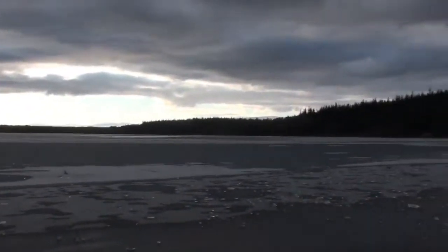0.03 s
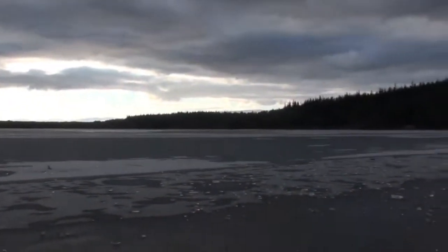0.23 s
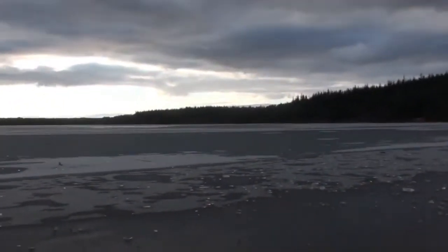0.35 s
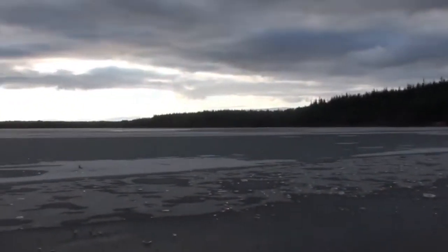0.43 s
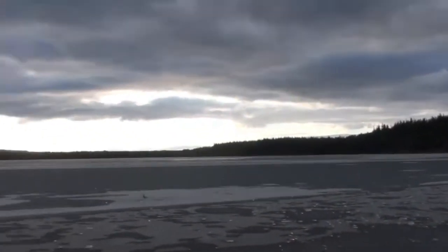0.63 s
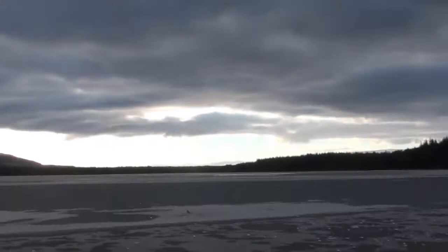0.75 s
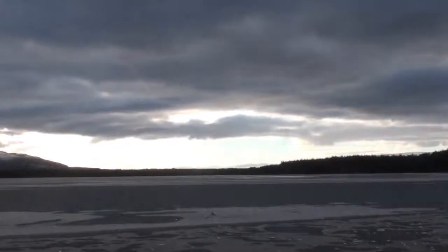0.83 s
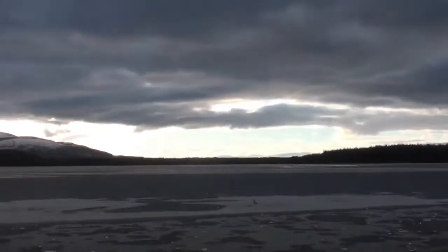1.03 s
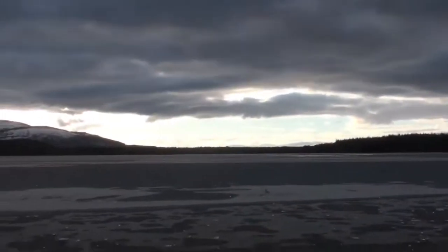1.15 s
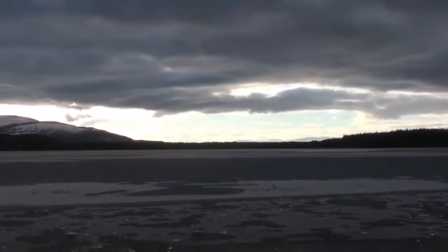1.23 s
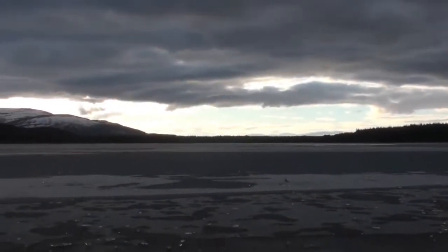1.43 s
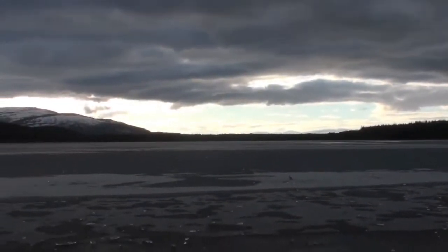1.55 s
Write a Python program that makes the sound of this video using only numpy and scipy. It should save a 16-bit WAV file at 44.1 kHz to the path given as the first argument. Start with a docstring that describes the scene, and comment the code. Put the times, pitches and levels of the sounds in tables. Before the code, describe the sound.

A lump of ice hits a frozen lake with a sharp clustered crack and chirp, then splinters tick, ring and slide over the sheet; outdoors, with low wind gusts bumping the microphone.

```python
"""Ice shattering on a frozen lake

A lump of ice lands on the sheet and breaks: filtered impulses make the cracks and thuds, dense grains
the splintering. Bending waves sound as falling chirps, the early ones just ahead of a crack in the air.
Splinters tick, ring and slide over the ice as struck resonances, random touches and smooth noise.
Wind buffets the microphone as low noise and pressure swings, over a faint far rush and one soft knock.
"""
import sys
import numpy as np
from scipy import signal
from scipy.fft import rfft, irfft
from scipy.io import wavfile
from scipy.ndimage import uniform_filter1d

SR = 44100
rng = np.random.default_rng(int(sys.argv[2]) if len(sys.argv) > 2 else 0)


def dump(signal):
    """Clip the signal to [-1, 1] and save it as 16-bit WAV at the path in sys.argv[1]."""
    limited = np.clip(np.atleast_2d(signal).T, -1, 1)
    pcm = np.round(limited * 32767).astype(np.int16)
    wavfile.write(sys.argv[1], SR, pcm)


N = 70560
TIME = np.arange(N) / SR
BINS = np.maximum(np.fft.rfftfreq(2 * N, 1 / SR), 1)  # Hz
HALVES = np.array([[.5], [-.5]])  # shares a left-right difference between the channels
OPPOSITE = np.array([[1], [-1]])  # side signal: opposite sign in left and right

# All *_SPECTRUM tables give a shape only, scaled to unit power: frequency_hz, relative_level_db

# Far rush: spectrum, and its course: time_s, level_db (before panning)
RUSH_SPECTRUM = [(30, -4.5), (200, 1), (400, -4.5), (850, 4), (1300, 1.5), (1900, -4.5), (2800, -20),
                 (12000, -22), (16000, -36.5)]
RUSH_COURSE = [(0, -52), (1.6, -47)]
RUSH_PAN_DB, RUSH_SIDE_DB = -4.5, -5.5  # left minus right; side relative to mid

# Wind rumble on the microphone: time_s, level_db; then its spectrum
WIND_COURSE = [(0, -50.5), (.4, -55), (.6, -39), (.78, -43.5), (1.0, -43.5), (1.27, -36.5), (1.36, -44),
               (1.6, -50)]
WIND_SPECTRUM = [(15, -10.5), (35, 2), (85, -0.5), (125, -4.5), (180, -17), (300, -25), (1500, -55)]
WIND_SIDE_DB = -8

# Single eddies hitting the microphone: centre_s, swing_level_db
EDDIES = [(0.59, -29), (0.638, -34.5), (0.723, -34), (0.925, -31.5), (1.003, -28), (1.05, -31),
          (1.149, -26.5), (1.21, -27.5), (1.257, -27.5), (1.297, -28)]
# Churning air inside an eddy
CHURN_SPECTRUM = [(40, -13), (140, 7.5), (220, -5.5), (400, -19), (1500, -43)]
EDDY_HZ, EDDY_WIDTH_S, CHURN_DB = 84.46, 0.01, -7.5  # churn level relative to the swing

# Soft low knock
KNOCK_SPECTRUM = [(80, -13), (260, -6.5), (700, -15), (4000, -42)]
KNOCK_S, KNOCK_DB, KNOCK_DECAY_S = 1.398, -41, 0.04

# Tumbling splinters: time_s, level_db; then their spectrum
TUMBLE_COURSE = [(.24, -80), (.28, -55), (.45, -45.5), (.75, -49), (.87, -49), (1.0, -51), (1.6, -58)]
TUMBLE_SPECTRUM = [(400, -12), (1000, -6), (1500, 13), (2400, -15), (4200, -1.5), (5400, -5.5), (6600, 7),
                   (8500, -5.5), (10200, -7), (12200, 1), (16000, -7)]
# Smooth sliding hiss: time_s, level_db; then its spectrum
SLIDE_COURSE = [(.24, -63), (.3, -55), (1.18, -53.5), (1.32, -45), (1.44, -44), (1.53, -56)]
SLIDE_SPECTRUM = [(300, 3.5), (2700, 3), (4500, -0.5), (7000, -7.5), (10000, -10), (13000, -7),
                  (16000, -12)]
TOUCHES_PER_S, TOUCH_SPREAD_DB, PING_DB = 5500, 6, -2  # pings relative to touches
PING_CYCLES = 81  # cycles in a 60 dB decay
SKITTER_SIDE_DB = -8

# Small splinters landing: start_s, level_db, pitch_hz
LANDINGS = [(.3674, -30.5, 11750), (.526, -30, 6730), (.5493, -34, 12100), (0.599, -34, 11700),
            (0.7008, -31.5, 6130), (0.7533, -28.5, 12830)]
TICK_T60_S, TICK_CLICK_DB, TICK_CLICK_DECAY_S = 0.017, 0, 0.0023  # click relative to ping

# Bounces of a flat shard: start_s, low_mode_level_db, high_mode_level_db
SHARD_BOUNCES = [(0.301, -37, -48), (0.4424, -25.5, -35), (0.47, -39, -38.5), (.481, -29, -45),
                 (0.484, -49, -34), (.701, -35.5, -38), (.723, -56, -33), (.832, -37, -35.5),
                 (.846, -41, -29.5), (.854, -33, -35), (1.027, -36, -41), (1.055, -32.5, -54)]
# Modes of the shard when it bounces: pitch_hz (mean), t60_s
SHARD_RESONANCES = [(2975, 0.041), (4020, 0.027)]
SHARD_DETUNE = .009  # relative spread of pitch from bounce to bounce
SHARD_TOUCHES_PER_S, SHARD_TOUCH_SPREAD_DB, SHARD_SLIDE_DB = 1800, 6.7, -56
SHARD_RATTLE_DB, SHARD_RATTLE_S = -24, .004  # level relative to the bounce; decay

# Bending waves in the sheet: loudest_s, level_db, pitch_there_hz, half_length_s
BENDING_WAVES = [(0.2345, -25.5, 1844, 0.0034), (0.251, -23, 1298, 0.0016), (0.2574, -13.5, 1595, 0.0021),
                 (0.2683, -19, 1565, 0.0029), (0.2752, -15, 1450, 0.0019), (.438, -36.5, 1734, 0.0052),
                 (0.482, -35, 1545, .0079), (0.543, -38, 1600, 0.0061), (0.649, -33.5, 1510, .0048),
                 (0.744, -37, 1484, 0.0081)]
CHIRP_FALL_PER_S, CHIRP_SPREAD_S = 70, .17  # first relative fall rate; delay at which it has halved
CHIRP_ROUGH = .2  # depth of the level's roughness

# Bursts of splintering: start_s, level_db, decay_s
BURSTS = [(0.239, -17.5, 0.0047), (0.2419, -21.5, 0.006), (0.2634, -21.5, 0.003), (0.2731, -24.5, 0.0051),
          (0.275, -30, 0.02), (.717, -37.5, 0.0095), (.814, -35, 0.0037), (.847, -32.5, 0.01),
          (1.057, -34, 0.0011)]
SPLINTER_SPECTRUM = [(200, -29), (700, -2.5), (1400, 8.5), (2600, 6), (4300, 4.5), (6000, 3), (9500, -1),
                     (12500, 1.5), (16000, -7)]
FRACTURES_PER_S, FRACTURE_SPREAD_DB = 26000, 4

# Hard blows on the sheet, levels relative: start_s, crack_level_db, brightness_hz, thud_level_db
IMPACTS = [(0.2412, -17, 8050, -28), (0.2427, -25, 4000, -23), (0.2443, -30, 3000, -9.5),
           (0.2608, -7.5, 3480, -17), (0.2709, -11.5, 16000, -11.5), (0.278, -22, 6000, -30),
           (0.4362, -19.5, 2200, -31.5), (0.6042, -19.5, 8850, -47), (0.6528, -16.5, 1840, -39),
           (0.8525, -30, 9000, -39), (1.0568, -19, 10700, -35)]
CRACK_SPECTRUM = [(300, -13.5), (2000, 2), (5000, 2.5), (16000, -3.5)]
THUD_SPECTRUM = [(100, -31), (220, -9), (450, -5), (1300, 4), (3000, -12), (8000, -30)]
CRACK_DECAY_S = 0.0004

# Direct sound from the ice at the two ports: frequency_hz, left_minus_right_db
PORT_BALANCE = [(250, 2), (600, 7.5), (1400, 13.5), (3800, 13.5), (6500, 6.5), (10000, -2.5), (13000, -1.5)]
# Direct sound from the ice at the two ports: frequency_hz, left_lead_rad
PORT_PHASE = [(300, -.1), (1500, -1.6), (4600, -2.1), (9800, -1.4), (12000, -.1)]
SCATTER_DB, SCATTER_DECAY_S = -11.5, 0.002
CUTOFF_HZ = 16150


def from_db(db):
    """Logarithmic level: 20 dB is a tenfold amplitude."""
    return 10 ** (np.asarray(db) / 20)


def rms_one(x):
    """Normalisation to unit mean power."""
    return x / np.sqrt(np.mean(x ** 2) + 1e-20)


def level(rows):
    """Amplitude modulation: gain over time, interpolated in decibels."""
    return from_db(np.interp(TIME, *np.transpose(rows)))


def per_bin(points):
    """Frequency response: a table interpolated along log frequency."""
    hz, value = np.transpose(points)
    return np.interp(np.log(BINS), np.log(hz), value)


def coloured(x, points):
    """Minimum-phase filtering: folding the cepstrum makes a causal response of unit power gain."""
    cepstrum = irfft(np.log(rms_one(from_db(per_bin(points)))))
    cepstrum[1:N] *= 2
    cepstrum[N + 1:] = 0
    response = np.exp(rfft(cepstrum))
    return irfft(rfft(x, 2 * N) * response)[..., :N]


def dying(s, decay_s):
    """Exponential decay after a sudden start."""
    return (TIME >= s) * np.exp(-np.maximum(TIME - s, 0) / decay_s)


def click(s):
    """Unit impulse."""
    return 1.0 * (np.arange(N) == int(s * SR))


def ring(x, hz, t60):
    """Damped resonance: a two-pole filter in which a unit click starts a sine of height about 1."""
    radius = from_db(-60 / (t60 * SR))
    turn = 2 * np.pi * hz / SR
    poles = [1, -2 * radius * np.cos(turn), radius * radius]
    return signal.lfilter([0, np.sin(turn)], poles, x + 1e-18)


def grains(per_s, spread_db):
    """Random point process: clicks of uneven size and sign, at unit power."""
    excess_db = spread_db * np.minimum(rng.exponential(1, N), 4)
    sizes = from_db(excess_db) * rng.choice([-1, 1], N)
    return rms_one(sizes * (rng.random(N) < per_s / SR))


def wide_noise(side_db):
    """Partial coherence: a shared mid noise plus a side noise of opposite sign."""
    mid, side = rng.standard_normal((2, N))
    return rms_one(mid + from_db(side_db) * side * OPPOSITE)


def far_rush():
    """Broadband noise: a faint distant rush, partly alike in both channels."""
    rush = level(RUSH_COURSE) * coloured(wide_noise(RUSH_SIDE_DB), RUSH_SPECTRUM)
    return rush * from_db(RUSH_PAN_DB * HALVES)


def wind():
    """Turbulent pressure: gusts rumble on the microphone; each eddy is a swing with churning air."""
    rumble = level(WIND_COURSE) * rms_one(coloured(wide_noise(WIND_SIDE_DB), WIND_SPECTRUM))
    churn = from_db(CHURN_DB) * coloured(rng.standard_normal((2, N)), CHURN_SPECTRUM)
    eddies = np.zeros((2, N))
    for s, db in EDDIES:
        passing = np.exp(-((TIME - s) / EDDY_WIDTH_S) ** 2)
        swing = np.sin(2 * np.pi * (EDDY_HZ * TIME + rng.random()))
        eddies += from_db(db) * passing * (swing + churn)
    return rumble + eddies


def knock():
    """Damped low noise: a soft knock close to the microphone."""
    burst = wide_noise(side_db=-13) * dying(KNOCK_S, KNOCK_DECAY_S)
    return from_db(KNOCK_DB) * coloured(burst, KNOCK_SPECTRUM)


def skitter():
    """Random excitation: tumbling touches ring at many pitches, beside the smooth hiss of sliding."""
    touches = grains(TOUCHES_PER_S, TOUCH_SPREAD_DB)
    pitches = np.linspace(1300, 15500, num=36)  # Hz
    dealt = rng.integers(0, len(pitches), N)  # one pitch for each touch
    pings = np.zeros(N)
    for k, hz in enumerate(pitches):
        pings += ring(touches * (dealt == k), hz, PING_CYCLES / hz) * np.sqrt(hz)
    tumble = rms_one(touches + from_db(PING_DB) * rms_one(pings))
    tumbling = level(TUMBLE_COURSE) * coloured(tumble, TUMBLE_SPECTRUM)
    sliding = level(SLIDE_COURSE) * coloured(rng.standard_normal(N), SLIDE_SPECTRUM)
    return tumbling + sliding


def ticks():
    """Impulse response: each small splinter lands with a noisy click and a short high ping."""
    out = np.zeros(N)
    for s, db, hz in LANDINGS:
        ping = ring(click(s), hz, TICK_T60_S)
        contact = dying(s, TICK_CLICK_DECAY_S) * rng.standard_normal(N)
        out += from_db(db) * (ping + from_db(TICK_CLICK_DB) * contact)
    return out


def shard():
    """Modal vibration: each bounce rattles and rings two detuned modes; sliding chatters faintly."""
    out, rub = np.zeros((2, N))
    touches = grains(SHARD_TOUCHES_PER_S, SHARD_TOUCH_SPREAD_DB)
    for k, (hz, t60) in enumerate(SHARD_RESONANCES):
        for s, *mode_db in SHARD_BOUNCES:
            rattle = from_db(SHARD_RATTLE_DB) * touches * dying(s, SHARD_RATTLE_S)
            bounce_hz = hz * (1 + SHARD_DETUNE * rng.normal())
            out += from_db(mode_db[k]) * ring(click(s) + rattle, bounce_hz, t60)
        # the ringing time is halved while sliding
        rub += ring(touches * rng.standard_normal(N), hz, t60 / 2)
    sliding = TIME > SHARD_BOUNCES[0][0]
    return out + from_db(SHARD_SLIDE_DB) * rms_one(rub) * sliding


def chirps():
    """Dispersion: high bending waves outrun low ones, so pitch glides down, more slowly from farther off."""
    # uneven ice roughens the level
    unevenness = rms_one(uniform_filter1d(rng.standard_normal(N), size=40))
    out = np.zeros(N)
    for s, db, hz, half_s in BENDING_WAVES:
        t = np.clip(TIME - s, -.03, .05)  # the glide is bounded far from the peak
        fall = CHIRP_FALL_PER_S / (1 + (s - BENDING_WAVES[0][0]) / CHIRP_SPREAD_S)
        turns = np.cumsum(hz * np.exp(-fall * t)) / SR + rng.random()
        swell = np.exp(-((TIME - s) / half_s) ** 2)
        out += from_db(db) * swell * np.sin(2 * np.pi * turns)
    return out * (1 + CHIRP_ROUGH * unevenness)


def splintering():
    """Superposed fractures: dense tiny clicks in quickly dying bursts."""
    bursts = sum(from_db(db) * dying(s, decay) for s, db, decay in BURSTS)
    fractures = grains(FRACTURES_PER_S, FRACTURE_SPREAD_DB)
    return coloured(bursts * fractures, SPLINTER_SPECTRUM)


def blows():
    """Impact: a crack with brief rattle, brighter for harder contact, and a dull push on the sheet."""
    crack, thud = np.zeros((2, N))
    for s, crack_db, bright_hz, thud_db in IMPACTS:
        rattle = rng.standard_normal(N) * dying(s + CRACK_DECAY_S, CRACK_DECAY_S)
        contact = signal.butter(2, min(bright_hz, SR / 2 - 1000), fs=SR)
        snap = signal.lfilter(*contact, 2 * click(s) + rattle / np.linalg.norm(rattle))
        crack += 2 * from_db(crack_db) * snap / np.linalg.norm(snap)
        thud += 4 * from_db(thud_db) * click(s)
    return coloured(crack, CRACK_SPECTRUM) + coloured(thud, THUD_SPECTRUM)


def across_the_ice(x):
    """Propagation: direct sound and a brief scatter off the rough surface reach two ports."""
    scatter = rng.standard_normal((2, N)) * dying(0.0012, SCATTER_DECAY_S)
    scatter *= from_db(SCATTER_DB) / np.linalg.norm(scatter, axis=1, keepdims=True)
    gains = from_db(HALVES * per_bin(PORT_BALANCE))
    gains /= np.sqrt(np.mean(gains ** 2, axis=0))  # the mean power of the ports stays flat
    direct = gains * np.exp(1j * HALVES * per_bin(PORT_PHASE))
    return irfft(rfft(x, 2 * N) * (direct + rfft(scatter, 2 * N)))[:, :N]


def scene():
    """Superposition: breaking ice and widely spread splinters, heard from the windy shore."""
    spread = skitter() + from_db(SKITTER_SIDE_DB) * skitter() * OPPOSITE
    ice = blows() + splintering() + chirps() + shard() + ticks() + spread
    return across_the_ice(ice) + wind() + far_rush() + knock()


def record(dry):
    """Low-pass filtering: the top is cut steeply, without phase shift."""
    gain = 1 / np.sqrt(1 + (BINS / CUTOFF_HZ) ** 240)
    return irfft(rfft(dry, 2 * N) * gain)[:, :N]


dry = scene()
out = record(dry)
dump(out)
```